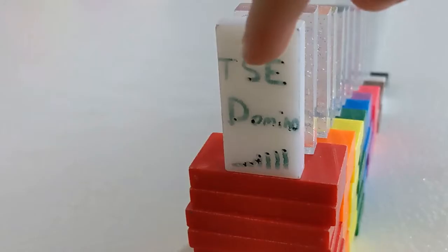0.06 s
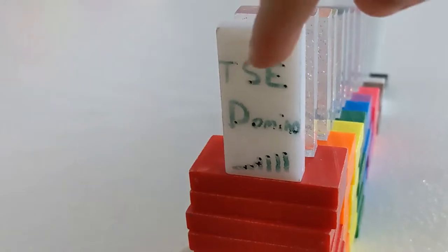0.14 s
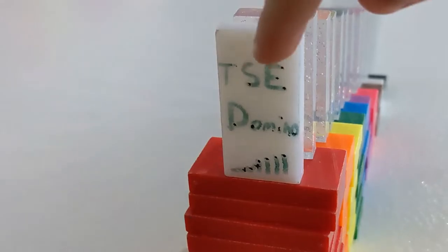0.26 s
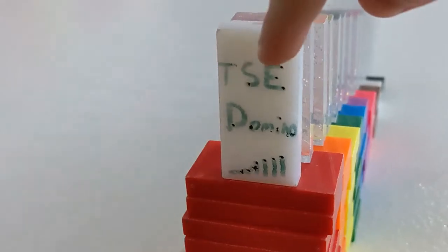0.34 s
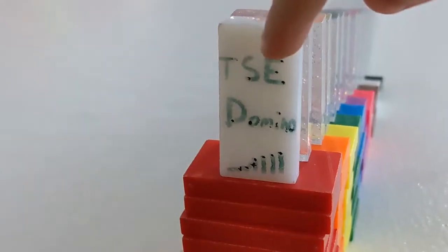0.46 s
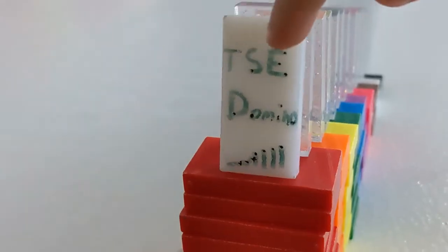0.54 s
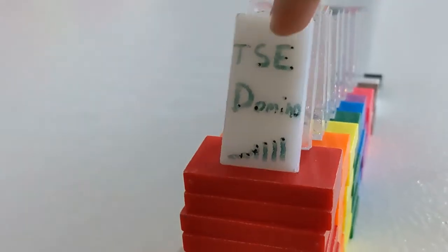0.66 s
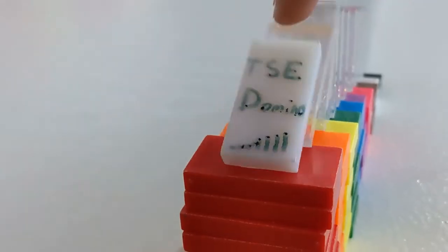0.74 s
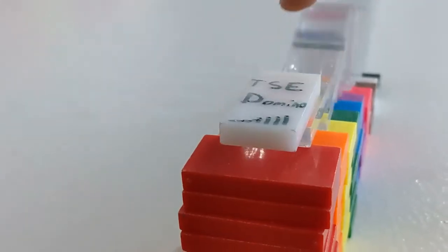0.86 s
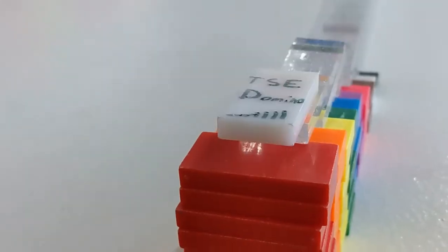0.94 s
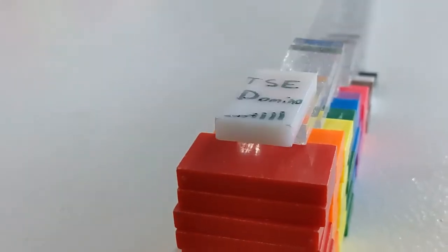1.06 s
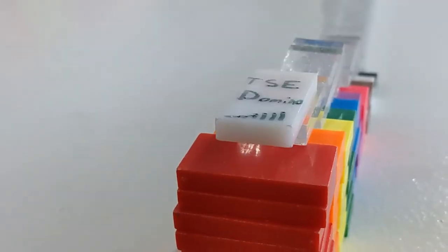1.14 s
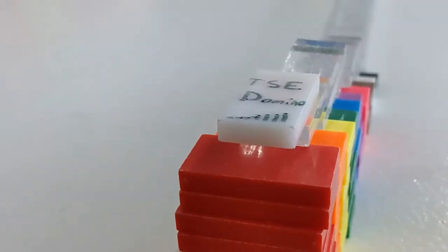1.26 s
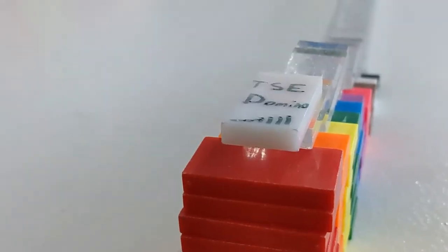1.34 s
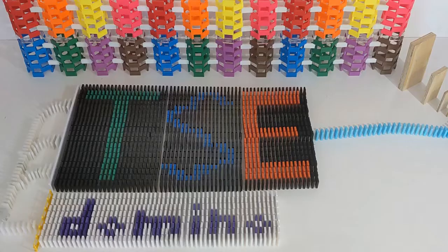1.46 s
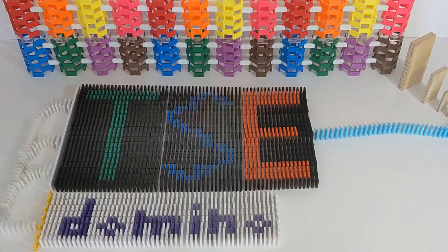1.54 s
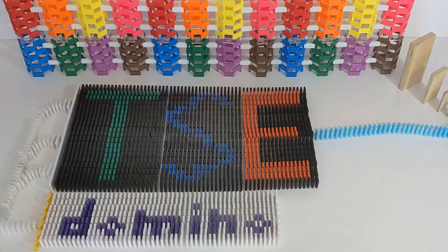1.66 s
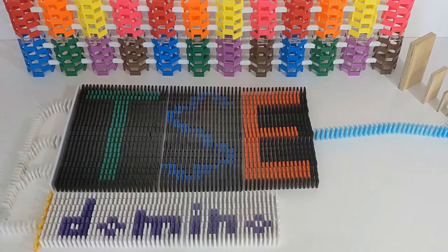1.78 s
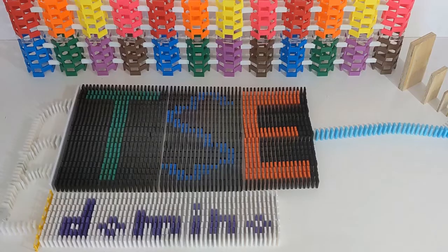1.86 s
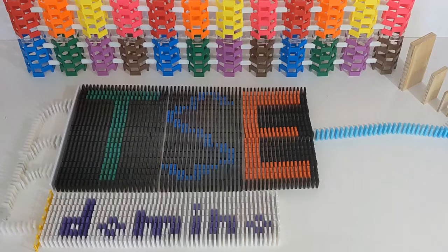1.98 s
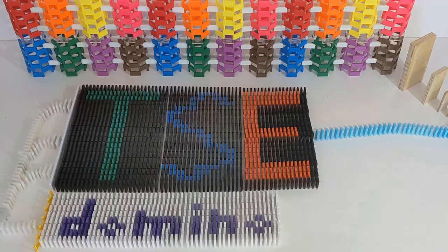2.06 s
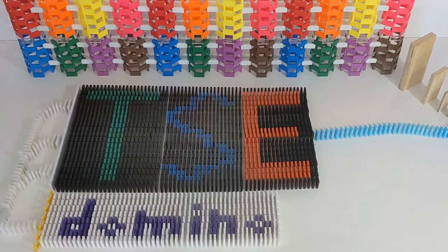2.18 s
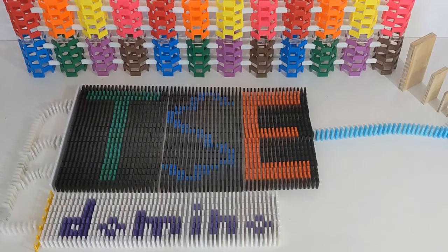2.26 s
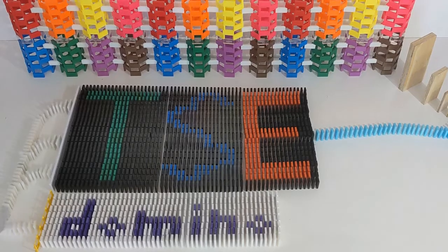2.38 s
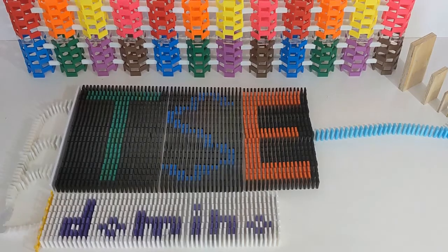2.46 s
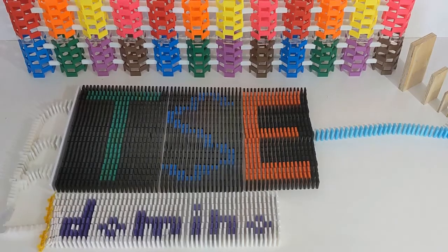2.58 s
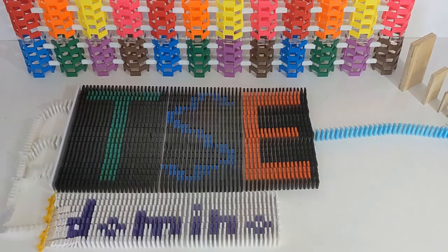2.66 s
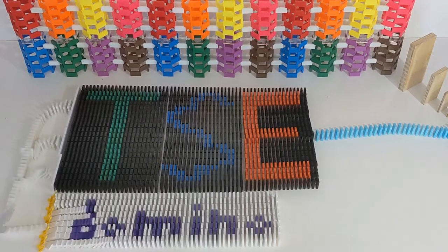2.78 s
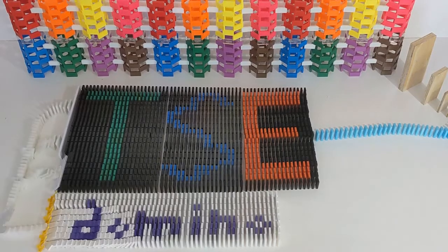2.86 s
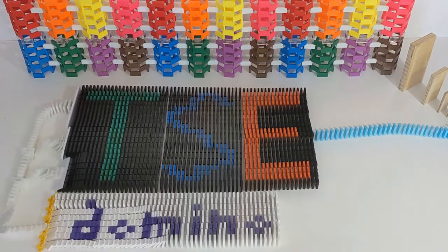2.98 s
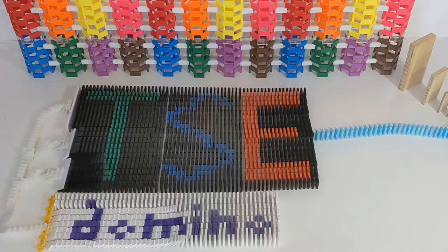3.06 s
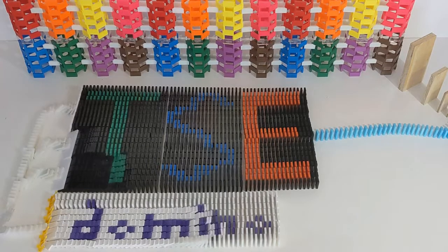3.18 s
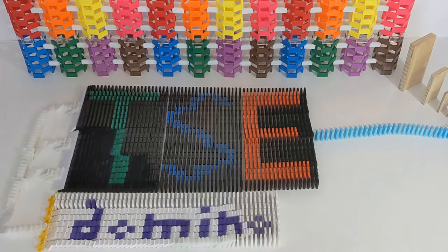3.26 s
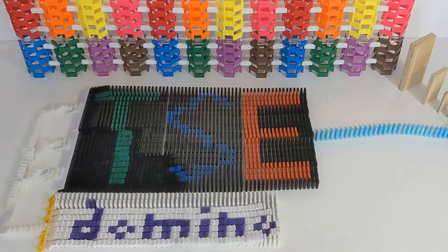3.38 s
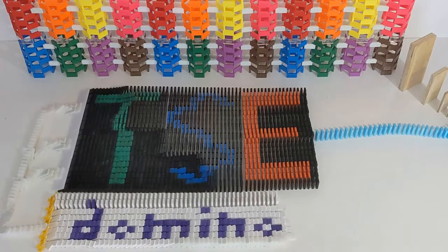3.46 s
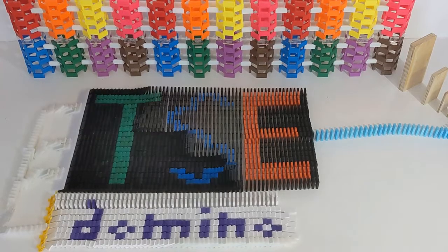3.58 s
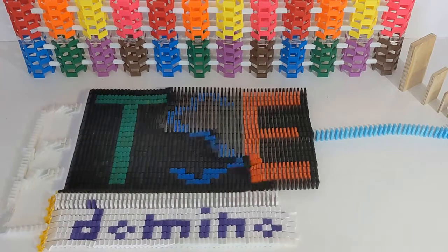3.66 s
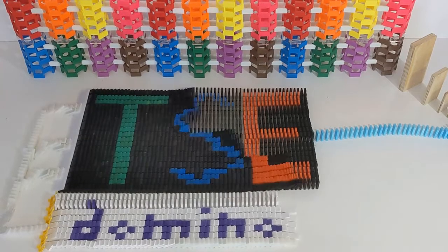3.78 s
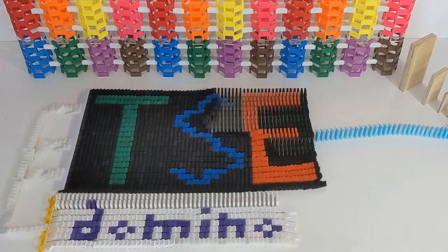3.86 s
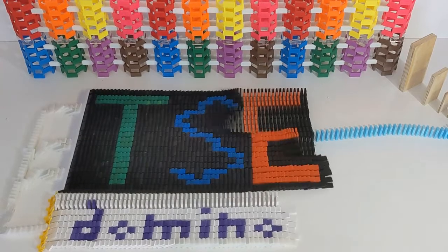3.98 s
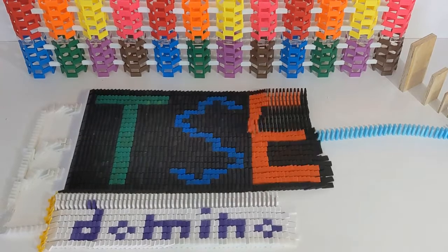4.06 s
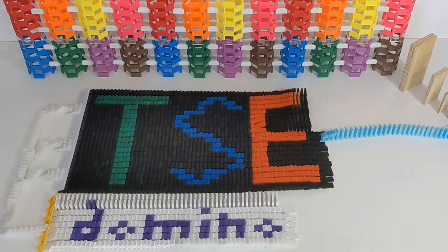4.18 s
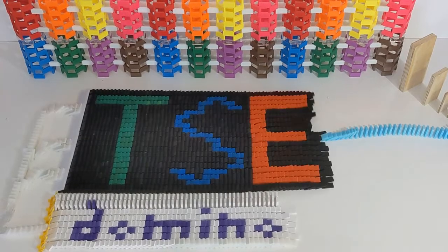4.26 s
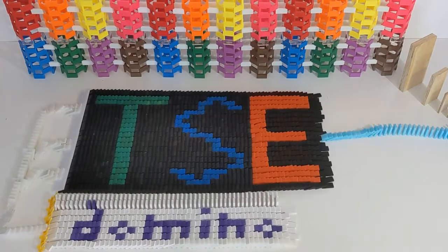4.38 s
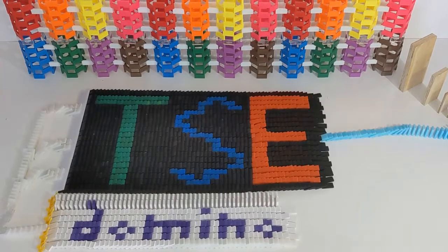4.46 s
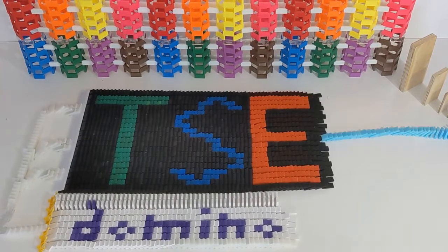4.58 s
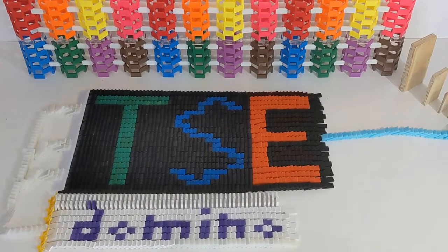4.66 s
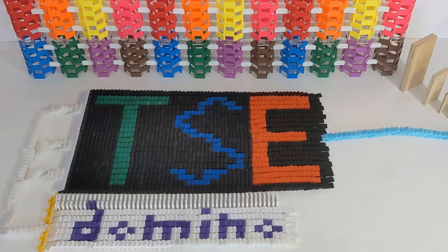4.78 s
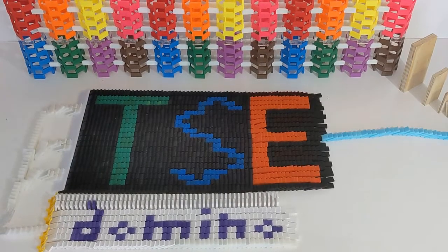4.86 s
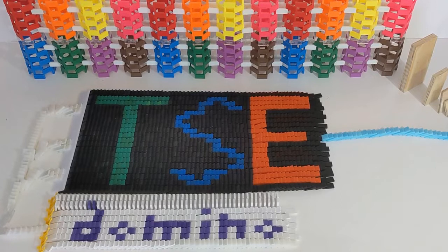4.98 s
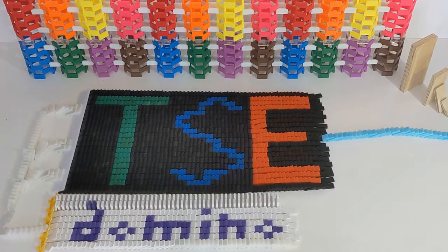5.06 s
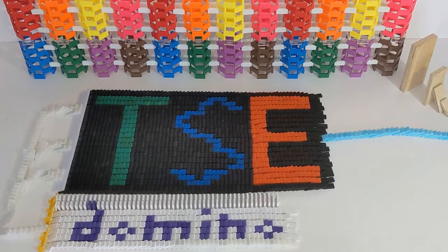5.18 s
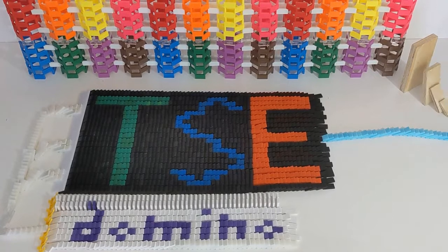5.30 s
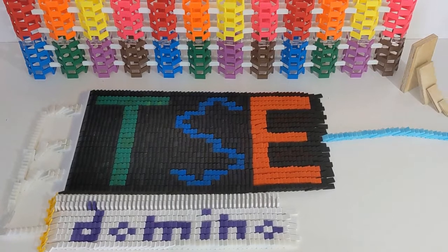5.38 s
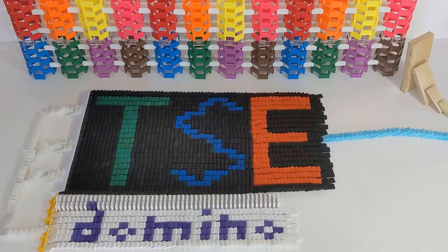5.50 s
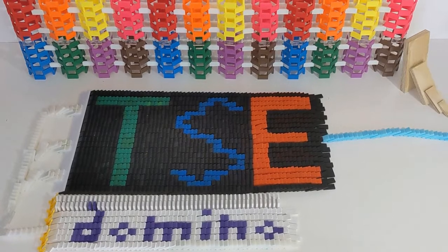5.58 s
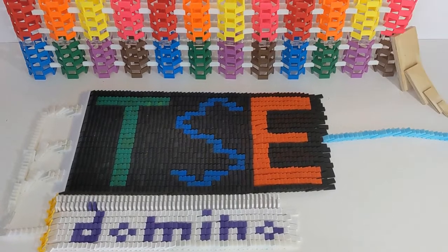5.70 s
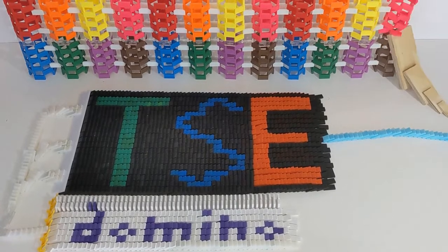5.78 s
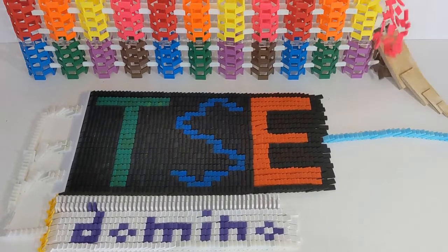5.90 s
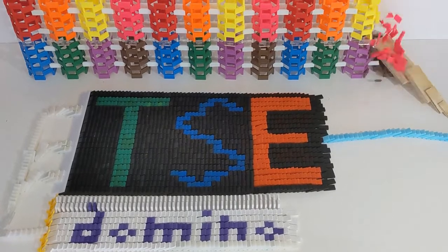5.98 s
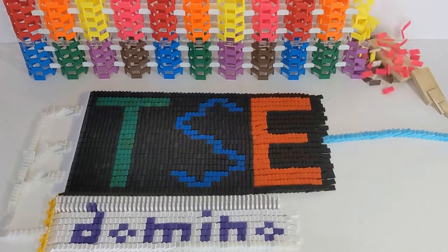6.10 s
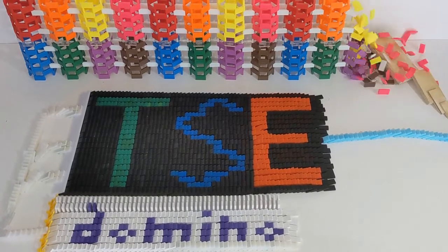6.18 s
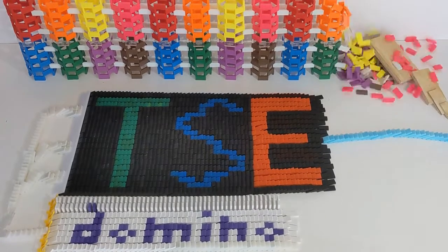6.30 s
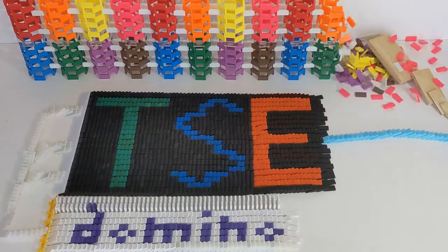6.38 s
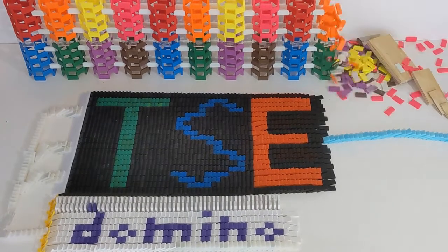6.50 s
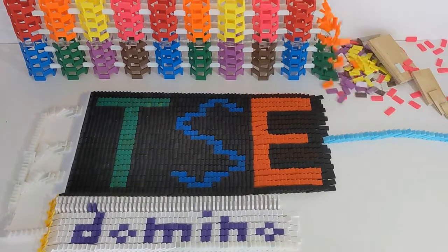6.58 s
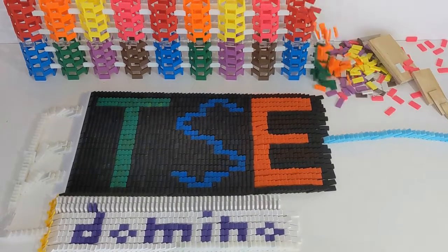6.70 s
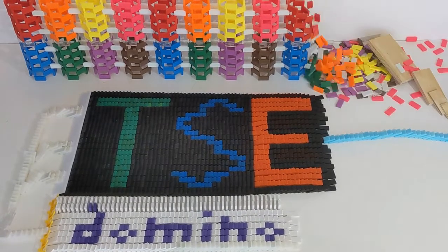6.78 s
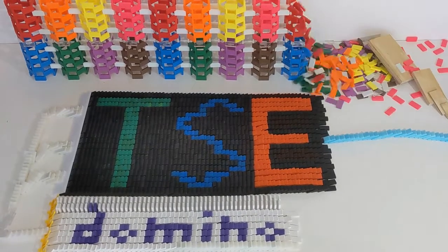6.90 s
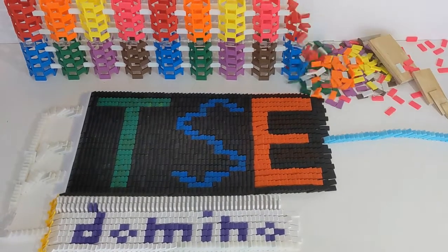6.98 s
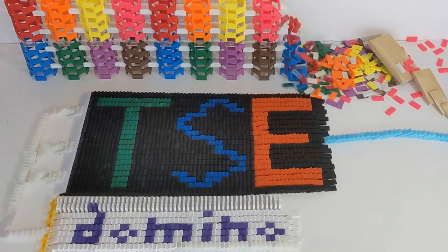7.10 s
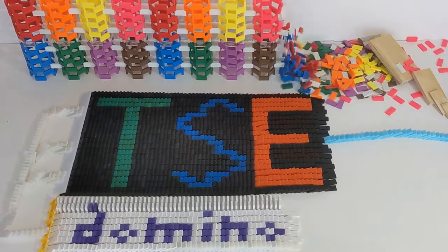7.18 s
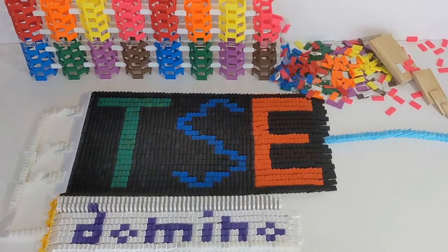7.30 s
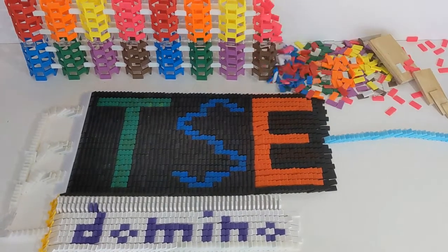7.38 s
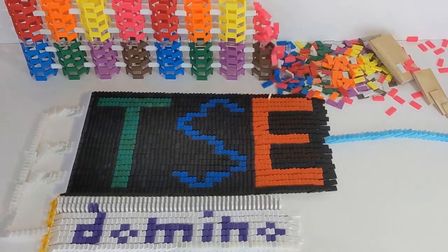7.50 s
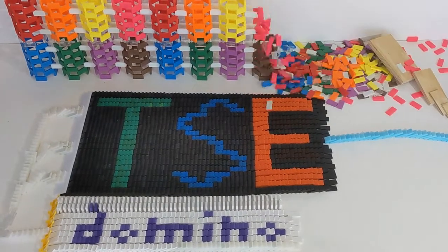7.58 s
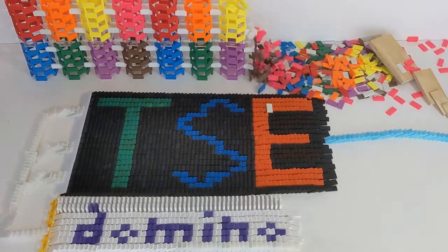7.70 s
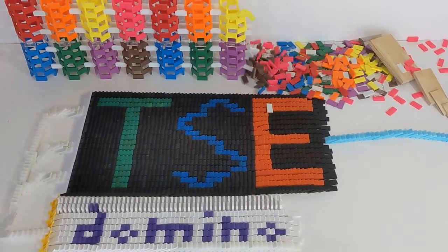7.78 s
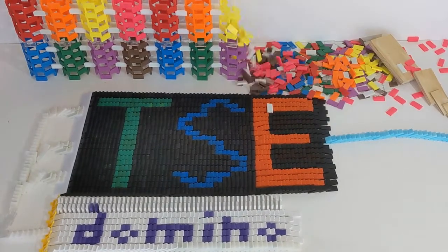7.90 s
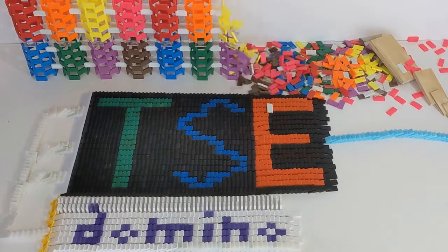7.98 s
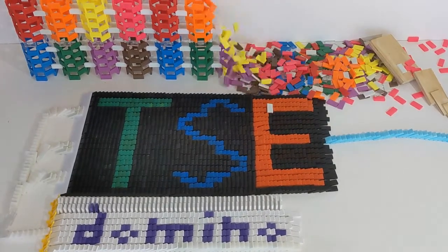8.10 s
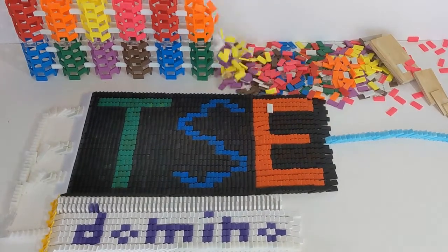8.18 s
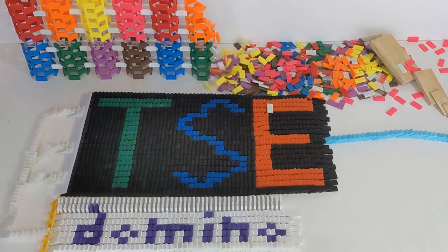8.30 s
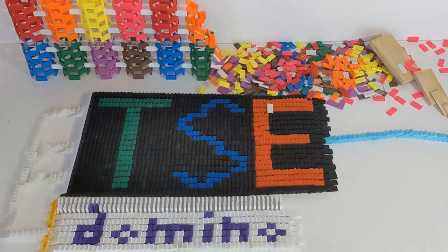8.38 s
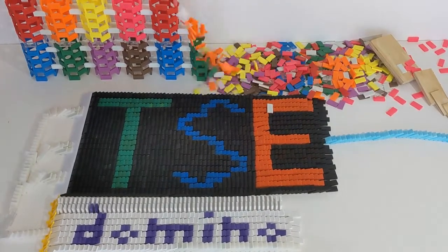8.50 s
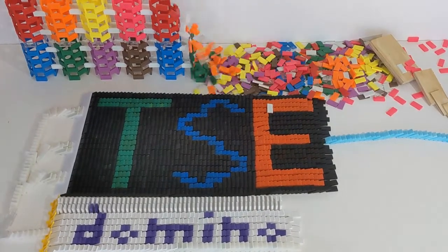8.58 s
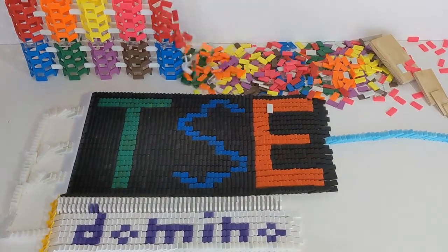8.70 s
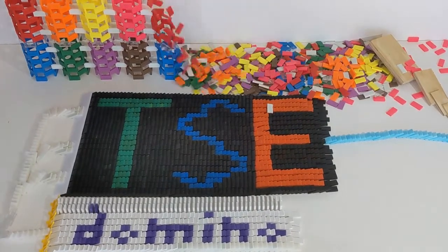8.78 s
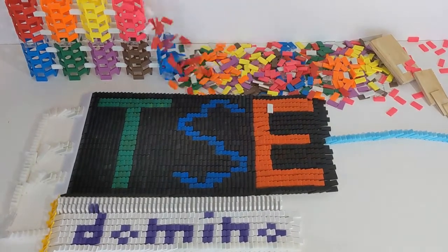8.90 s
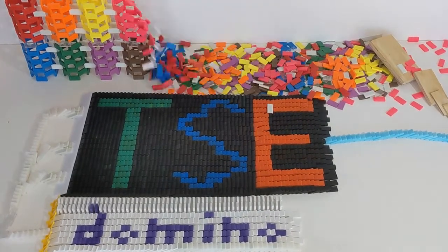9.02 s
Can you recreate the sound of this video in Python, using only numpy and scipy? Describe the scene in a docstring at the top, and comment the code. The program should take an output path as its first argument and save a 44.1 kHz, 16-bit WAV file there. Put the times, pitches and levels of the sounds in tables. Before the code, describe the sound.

Plastic dominoes topple in a bright, fast clicking rattle, wooden blocks knock over, then a stacked domino wall crashes down.

```python
"""A bright, clicking rattle of falling dominoes: a row of clear plastic tiles gathers speed, runs through
fields of opaque ones, knocks over wooden blocks of growing size and brings down a stacked wall.
The contacts click, ring the tiles, slap the air between their faces and thump the table.
A bare, live room answers, heard in stereo as from two spaced microphones."""
import sys
import numpy as np
from scipy import signal
from scipy.fft import rfft, irfft, next_fast_len
from scipy.io import wavfile
from scipy.ndimage import map_coordinates

SR = 44100
rng = np.random.default_rng(int(sys.argv[2]) if len(sys.argv) > 2 else 0)


def generate_wav(signal):
    """Clip the signal to [-1, 1] and save it as 16-bit WAV at the path in sys.argv[1]."""
    frames = np.transpose(np.atleast_2d(signal))
    scaled = np.clip(frames, -1, 1) * 32767
    pcm = np.round(scaled).astype(np.int16)
    wavfile.write(sys.argv[1], SR, pcm)


N = 399105

# ring of a clear tile: (frequency [Hz], width [Hz], level [dB])
CLEAR_RING = [(3120, 300, -7), (4380, 200, -5), (4750, 350, -6), (5680, 200, 0), (6210, 130, -7),
              (7000, 500, -8), (9000, 500, -12), (10060, 170, -11), (10960, 170, -11), (13000, 150, -3),
              (14140, 190, -8), (15500, 400, -12)]
# air slapped between clear faces, and between opaque ones: (frequency [Hz], width [Hz], level [dB])
CLEAR_SLAP_MODES = [(1340, 240, -9), (1720, 1120, 7.5), (2340, 410, 12.5), (2690, 400, -15.5)]
OPAQUE_SLAP_MODES = [(1128, 435, -11), (1378, 268, -4.5), (1880, 320, -2), (2300, 220, 1),
                     (2880, 400, -22.5)]
# thump of the tabletop: (frequency [Hz], width [Hz], level [dB])
TABLETOP_MODES = [(74, 6, -7), (147.8, 23, -3.5), (197.4, 41, -2), (237.4, 58, -0.5), (358, 55, -5),
                  (426, 88, -2.5), (622, 356, 2), (744, 384, 1.5)]
# tone of a bare contact's crack: (frequency [Hz], gain [dB])
CRACK_EQ = [(1000, -18.5), (3000, 10), (6000, 6.5), (9000, -0.5), (12000, 5), (16000, 3.5)]


def toppling(run, ring_modes, slap_modes, per_s, uneven_db, spread, crack_db, gain_db, ring_db,
             glint, thump_db, flicker_db):
    """Tiles about the moving front collide at random, a few much harder than the rest.
    glint: (offset from the slap [dB], extra share of the slap's swing, share of the ring curve)."""
    slap_db, bright_db = in_time(run)
    swing_db = slap_db - np.mean(run, axis=0)[1]
    glint_db = slap_db + glint[0] + glint[1] * swing_db + glint[2] * bright_db
    time = np.arange(N) / SR
    gate = np.clip(np.minimum(time - run[0][0], run[-1][0] - time) / 0.0056, 0, 1)
    at = np.flatnonzero((rng.random(N) < per_s / SR) & (gate > 0))
    aside = spread * rng.standard_normal(N)[at]
    force_db = uneven_db * np.minimum(rng.exponential(1, N), 4)
    sizes = (from_db(force_db) * rng.choice([-1, 1], N))[at]
    ring = rms_one(strike(ring_modes, at, sizes, 6.8, aside))
    ring = rms_one(ring + from_db(crack_db) * rms_one(crack(at, sizes, aside)))
    top = rms_one(filtered(ring, 4, 9000, "high"))
    body = rms_one(filtered(ring, 4, 9000, "low"))
    hollow, slap = (rms_one(strike(m, at, sizes, 4.0, aside)) for m in split_modes(slap_modes, 1600))
    thump = strike(TABLETOP_MODES, at, sizes, 5.23)
    thump = rms_one(filtered(thump, 2, 55, "high"))   # the thump carries little below about 55 Hz
    # the slap's hollow low end: (time [s], level against the slap [dB])
    hollow_curve = [(0.8, -16), (1.1, 3.5), (1.35, -13.5), (1.65, -2), (1.97, -22), (2.15, 2), (2.35, 4),
                    (2.6, 3), (2.85, -8), (3.45, -3.5), (4.1, -9.5), (4.6, -8), (4.9, 3.5), (6.0, -5.5),
                    (6.6, -8), (9.05, -7.5)]
    layers = [(slap_db + bright_db + ring_db, body), (glint_db, top),
              (slap_db + in_time(hollow_curve)[0], hollow), (thump_db + 0.56 * swing_db, thump)]
    # each layer wavers on its own as different tiles take over
    wavering = sum(from_db(db + flicker_db * drift(rate_hz=8.0)) * x for db, x in layers)
    return np.sqrt(np.mean(gate)) * gate * from_db(gain_db) * (from_db(slap_db) * slap + wavering)


def clear_row():
    """The opening row falls in a glassy rattle with little table thump."""
    # (time [s], slap level [dB], ring against slap [dB])
    run = [(0.81, -30, -7), (0.93, -31.5, -2), (1.08, -26.5, 8.5), (1.17, -33, -1.5), (1.34, -26.5, 2),
           (1.54, -28.5, -3.5), (1.65, -26.5, -4), (1.8, -30, -4.5), (1.97, -24.5, -7), (2.1, -27.5, -1.5),
           (2.28, -25.5, -9), (2.42, -52, 1)]
    return toppling(run, CLEAR_RING, CLEAR_SLAP_MODES, per_s=1300, uneven_db=4.0, spread=3.2,
                    crack_db=2.5, gain_db=-2.0, ring_db=-1.0, glint=(4.0, -.7, .05),
                    thump_db=-43.5, flicker_db=2.0)


def opaque_fields():
    """Many tiles fall side by side in a wider, denser, more even rattle."""
    # (time [s], slap level [dB], ring against slap [dB])
    run = [(2.3, -29, -2.5), (2.63, -30.5, -3), (2.74, -28, -0.5), (2.87, -19, -6.5), (2.95, -23, -2),
           (3.26, -17, -5.5), (3.48, -21.5, -1), (3.61, -23, -1), (3.9, -17, -3.5), (4.0, -24, 4),
           (4.06, -23, -4.5), (4.16, -19, 1), (4.26, -23.5, -6.5), (4.33, -21.5, 1.5), (4.36, -22, 7),
           (4.48, -30, -3), (4.6, -25, -5), (4.91, -36.5, -2)]
    # ring of an opaque tile: (frequency [Hz], width [Hz], level [dB])
    ring_modes = [(3210, 540, -2.5), (4404, 240, 2.5), (5500, 710, -28), (7180, 320, 3), (8230, 400, -3),
                  (9100, 560, -2.5), (10400, 250, -21), (11900, 400, -6), (11900, 800, -11.5),
                  (13300, 660, -2.5), (14400, 500, -19), (15600, 500, -6)]
    return toppling(run, ring_modes, OPAQUE_SLAP_MODES, per_s=1600, uneven_db=1.5, spread=6.0,
                    crack_db=2.0, gain_db=-1, ring_db=-1.5, glint=(-2.5, .4, .9),
                    thump_db=-40.5, flicker_db=1.5)


def stacked_wall(ring_modes):
    """Stacked tiles crash down unevenly and thump the table harder."""
    # (time [s], slap level [dB], ring against slap [dB])
    run = [(5.8, -34.5, -10), (5.89, -21, -1.5), (5.93, -37, 4), (5.94, -21.5, 2.5), (6.0, -25, 3),
           (6.08, -19, -5.5), (6.32, -19.5, -2), (6.98, -21.5, 0.5), (7.03, -21.5, -6), (7.05, -19, 0),
           (7.08, -26.5, 9), (7.13, -22, -1), (7.15, -23, 0), (7.33, -19, -4), (7.56, -19.5, -5.5),
           (7.58, -20.5, 0.5), (7.84, -17, -4.5), (7.86, -21, 0), (8.0, -16.5, -6), (8.02, -20.5, -0.5),
           (8.76, -17, -4.5), (8.93, -27.5, 4), (8.95, -14, -10.5), (9.05, -25, 5)]
    return toppling(run, ring_modes, OPAQUE_SLAP_MODES, per_s=1500, uneven_db=3.5, spread=6.0,
                    crack_db=0.0, gain_db=-1.5, ring_db=1.5, glint=(-3.0, .05, .9),
                    thump_db=-37.5, flicker_db=1.5)


def clear_clicks(rows, length_s, ring_db, glint_db, slap_db, crack_db, scatter_db):
    """Single clear tiles click above the rattle, each with its own share of glint and slap."""
    # the tone shifts as the row runs away: (time [s], glint [dB], slap [dB])
    receding = [(0.73, -21.5, -14), (0.93, -18, -29.5), (1.12, -11, -12), (1.45, -20, -23)]
    at, sizes, row = chatter(rows, length_s, fade_db=2.5, count=6)
    shares = from_db(scatter_db * rng.standard_normal((len(rows), 2)))[row].T
    glint, slap = shares * from_db(in_time(receding))[:, at.astype(int)]
    body_modes, glint_modes = split_modes(CLEAR_RING, 8800)
    return (from_db(ring_db) * strike(body_modes, at, sizes, 2.9)
            + from_db(glint_db) * strike(glint_modes, at, sizes * glint, 0.67)
            + from_db(crack_db) * crack(at, sizes * np.sqrt(glint))
            + from_db(slap_db) * strike(CLEAR_SLAP_MODES, at, sizes * slap, 2))


def first_tiles():
    """The first tiles gather speed; a few later ones land hard."""
    # (time [s], level [dB])
    landings = [(0.515, -43.5), (0.7294, -16), (0.7336, -15), (0.8055, -0.5), (0.8527, 0), (0.8564, 0.5),
                (0.8834, -1), (0.895, 0.5), (0.8984, -17), (0.9178, 0), (0.9254, -7), (0.948, -5),
                (0.9725, -4), (0.9985, -8), (1.0246, -1.5), (1.0465, -12.5), (1.0632, -5), (1.079, -13),
                (1.0894, -34.5), (1.102, -2), (1.2908, -2.5), (1.3344, -10), (1.4376, 0), (1.6, -11)]
    return clear_clicks(landings, length_s=.0035, ring_db=21.5, glint_db=34.5, slap_db=16.5,
                        crack_db=-14, scatter_db=6.0)


def ticking(start_s, every_s, count):
    """At full speed the clear row ticks almost evenly."""
    jitter = rng.standard_normal((count, 2))
    times = start_s + every_s * np.arange(count) + .0006 * jitter[:, 0]
    levels_db = -11.5 + 2.2 * jitter[:, 1]
    return clear_clicks(list(zip(times, levels_db)), length_s=.002, ring_db=20.5, glint_db=33,
                        slap_db=23, crack_db=-3, scatter_db=3.0)


def wooden_blocks():
    """Each block knocks and rings on a note set by its size; the heavier ones shake the table."""
    # (time [s], level [dB], crack [dB], thump [dB], note [Hz], note level [dB])
    knocks = [(4.827, -23, -15, -29, 1410, -4), (4.852, -8, -22, -34, 1110, 0),
              (4.923, -2, -29, -37, 1094, -24), (5.022, -10, 6.5, -28, 1400, -5),
              (5.12, -9.5, 0, -16.5, 2280, -21), (5.139, -20, -15, -16, 2350, 15),
              (5.445, -10.5, -19, -4, 1950, -4), (5.696, -23, -11, -24, 1270, 17),
              (5.717, -15, -33, -15, 1252, 12.5), (5.732, -17, -24, -12, 1277, 7.5),
              (5.779, -19.5, -25, -12, 1300, -4), (5.827, -20, -1, -8, 1230, 6),
              (5.895, -10.5, -12, -16, 1270, 11), (5.943, -4.5, -1.5, -25.5, 2300, 3),
              (6.018, -3.5, -12, -23, 1290, 4), (6.09, -10.5, -15, -14.5, 1280, 10),
              (6.139, -12, 1, -38.5, 1240, -6)]
    # woody body of a knock: (frequency [Hz], width [Hz], level [dB])
    wood_modes = [(527, 530, -14.5), (844, 110, -5.5), (1100, 230, 5), (1400, 600, 2.5), (1950, 160, 7),
                  (2300, 870, 1), (3600, 1340, -2.5), (4680, 1720, -6)]
    at, sizes, row = chatter(knocks, length_s=.011, fade_db=8.0, count=8)
    crack_db, thump_db = np.array(knocks)[row, 2:4].T
    # later blocks are bigger and reach the table's deepest modes
    deep = from_db(0.63 * thump_db + 15.5 * (at / SR - knocks[-1][0]))
    deep_modes, thump_modes = split_modes(TABLETOP_MODES, 150)
    push = np.abs(sizes)   # the table is always pushed down
    notes = sum(strike([(hz, 30, db)], at[row == k][:1], push[row == k][:1], 0.75)   # first touch only
                for k, (*_, hz, db) in enumerate(knocks))
    dull_crack = filtered(crack(at, sizes * from_db(crack_db)), 2, 7200, "low")   # softer than plastic
    return (from_db(21.5) * strike(wood_modes, at, sizes, 0.56)
            + from_db(31.5) * notes + from_db(9.0) * dull_crack
            + from_db(39) * strike(thump_modes, at, push * from_db(thump_db), 0.31)
            + from_db(47.5) * strike(deep_modes, at, push * deep, 0.55))


def loose_pings(ring_modes, width_hz, ping_db, ring_db, crack_db):
    """A loose tile struck on an edge or corner sounds one mode far above the rest."""
    # (time [s], level [dB], pitch [Hz])
    pings = [(2.4214, -12, 11500), (2.5466, -8, 9100), (3.1158, 4, 11000), (3.169, 7, 11700),
             (3.5346, 6, 6700), (3.981, 2, 7040), (4.338, 7, 7190), (4.853, -2, 4500), (5.8685, -5, 4020),
             (5.9676, -18, 4060), (6.2525, -37, 4280), (6.297, -24, 4370), (6.6287, 0, 6760),
             (6.6594, 2, 14100), (6.937, -11, 6600), (7.1521, -8, 6700), (7.3567, -17, 4350),
             (7.58, 8, 12950), (7.6194, -24, 4300), (7.7714, -25, 4400), (8.182, 3, 4330), (8.775, 6, 4440),
             (8.809, 3, 13200)]
    at, sizes, row = chatter(pings, length_s=0.0035, fade_db=4.0, count=4)
    notes = sum(strike([(hz, width_hz, 0)], at[row == k], sizes[row == k], 0.46)
                for k, (_, _, hz) in enumerate(pings))
    return (from_db(ping_db) * notes + from_db(ring_db) * strike(ring_modes, at, sizes, 5.4)
            + from_db(crack_db) * crack(at, sizes))


def link_row(start_s, end_s, per_s):
    """A lone row leads from the fields to the blocks, its quick contacts ringing thinly."""
    # (frequency [Hz], width [Hz], level [dB])
    thin_modes = [(4570, 350, -0.5), (9930, 150, -4.5), (11400, 140, -6)]
    time = np.arange(N) / SR
    at = np.flatnonzero((rng.random(N) < per_s / SR) & (time > start_s) & (time < end_s))
    return from_db(14.5) * strike(thin_modes, at, rng.standard_normal(N)[at] / 10, 5.0)


def chatter(rows, length_s, fade_db, count):
    """A face never lands flat: a first touch, then weaker ones. Gives times [samples], sizes, rows."""
    draw = rng.random((len(rows), 2 * count))
    rebound = np.arange(count) > 0
    late = draw[:, :count] * rebound
    at = (np.array(rows)[:, :1] + length_s * late) * SR
    sizes = from_db(np.array(rows)[:, 1:2] - fade_db * (late + rebound)) * np.sign(draw[:, count:] - .5)
    return at.ravel(), sizes.ravel(), np.repeat(np.arange(len(rows)), count)


def strike(modes, at, sizes, scatter_db, spread=0):
    """Each contact rings every mode with a strength of its own."""
    strength = from_db(scatter_db * rng.standard_normal((len(at), len(modes))))
    out = 0
    for k, (hz, width, level_db) in enumerate(modes):
        r = np.exp(-np.pi * width / SR)
        poles = [1, -2 * r * np.cos(2 * np.pi * hz / SR), r * r]
        gain = from_db(level_db) * (1 - r * r) / 2 * (-1) ** k
        out = out + signal.lfilter([gain, 0, -gain], poles, place(at, sizes * strength[:, k], spread))
    return out


def crack(at, sizes, spread=0):
    """The bare snap of contact: each click becomes a sharp, minimum-phase pulse."""
    hz = np.maximum(np.fft.rfftfreq(4096, 1 / SR), 1)
    cepstrum = irfft(np.log(from_db(at_hz(CRACK_EQ, hz))))
    cepstrum[1:2048] *= 2   # folded onto positive times, so nothing sounds before the hit
    pulse = irfft(np.exp(rfft(cepstrum[:2048], 4096)))
    size = next_fast_len(N + 4096)
    return irfft(rfft(place(at, sizes, spread), size) * rfft(pulse, size), size)[..., :N]


def place(at, sizes, spread=0):
    """Clicks panned and delayed to follow the action; spread [samples] shifts each aside."""
    # (time [s], lag of the left channel [samples], left over right [dB])
    path = [(0, 9.5, 18), (1.2, 7.5, -6), (1.7, 4, 5), (2.2, -10.5, 2), (3.2, -5.5, 3.5), (4.2, 0, 6.5),
            (4.8, 7.5, 3), (5.8, 2, 2.5), (7, 0, 3.5), (9.05, -3.5, 1)]
    times, lags, pans = np.transpose(path)
    lag, pan_db = (np.interp(at / SR, times, c) for c in (lags, pans))
    out = np.full((2, N), 1e-18)
    for channel, side in enumerate((.5, -.5)):
        arrival = np.clip(np.round(at + side * (lag + spread)).astype(int), 0, N - 1)
        np.add.at(out[channel], arrival, sizes * from_db(side * (pan_db - 0.066 * spread)))
    return out


def room(send, first_s, step_s, count):
    """Dense reflections die away band by band; their pattern shifts each step as the action moves."""
    # (frequency [Hz], time to fall 60 dB [s])
    decay = [(100, 0.83), (500, 0.63), (2000, 0.7), (5000, 0.52), (10000, 0.19), (16000, 0.32)]
    length = int(.55 * SR)
    time = np.arange(length) / SR
    turn = np.arange(N) / SR / step_s
    bands = list(stereo_bands(count * length))
    out = 0
    for k in range(count):
        tail = sum(band[:, k * length:(k + 1) * length] * from_db(-60 * time / at_hz(decay, hz))
                   for hz, band in bands)
        tail = tail * np.clip(time / first_s - 1, 0, 1) / np.sqrt(SR)
        steps_away = np.abs((turn - k + count / 2) % count - count / 2)
        crossfade = np.sqrt(np.clip(1 - steps_away, 0, 1))
        out = out + signal.oaconvolve(crossfade * send.mean(axis=0, keepdims=True), tail, axes=1)[:, :N]
    return out


def room_tone():
    """Steady air and microphone hiss over a low rumble that wavers at the start."""
    # colour of the air: (frequency [Hz], relative level [dB])
    air_eq = [(18, -49), (30, -25.5), (85, -15), (249, -10.5), (359, -35), (410, -15), (518, -14.5),
              (622, -25.5), (1050, -21.5), (1680, -29), (15500, -40)]
    # (time [s], level [dB])
    rumble_curve = [(0.04, -74), (0.124, -58), (0.152, -73), (0.508, -78), (0.596, -56), (0.8, -66.5)]
    bands = list(stereo_bands(N))
    air = rms_one(sum(from_db(at_hz(air_eq, hz)) * band for hz, band in bands))
    rumble = rms_one(sum(band for hz, band in bands[2:4]))
    return from_db(-66) * air + from_db(in_time(rumble_curve)[0]) * rumble


def stereo_bands(length):
    """Half-octave noise bands, as alike left and right as the microphone spacing allows."""
    # (frequency [Hz], left-right correlation [0-1])
    likeness = [(60, 0.98), (150, 1), (300, 0.92), (600, 0.62), (1200, 0.02), (16000, 0.24)]
    edges = 30 * 2 ** np.arange(0, 9.6, .5)
    white = rng.standard_normal((2, 2, length))
    for k, (low, high) in enumerate(zip(edges, edges[1:])):
        mid, side = filtered(white[k % 2], 2, [low, high], "band")
        hz = np.sqrt(low * high)
        alike = at_hz(likeness, hz)
        yield hz, np.sqrt(1 + alike) * mid + np.sqrt(1 - alike) * side * [[1], [-1]]


def drift(rate_hz):
    """A slow wobble: random points joined smoothly."""
    return map_coordinates(rng.standard_normal(256), [np.arange(N) / SR * rate_hz * 2], order=3)


def split_modes(modes, edge_hz):
    """Modes under and over an edge."""
    return [m for m in modes if m[0] < edge_hz], [m for m in modes if m[0] >= edge_hz]


def filtered(x, order, hz, kind):
    """A low-, high- or band-pass with a flat passband."""
    return signal.sosfilt(signal.butter(order, hz, kind, fs=SR, output="sos"), x)


def from_db(db):
    """Gain of a level."""
    return 10 ** (np.asarray(db) / 20)


def rms_one(x):
    """Scaled to unit rms."""
    return x / np.sqrt(np.mean(x ** 2) + 1e-20)


def in_time(rows):
    """Columns of a curve at every sample."""
    times, *columns = np.transpose(rows)
    return [np.interp(np.arange(N) / SR, times, c) for c in columns]


def at_hz(points, hz):
    """A curve read on a log frequency axis."""
    return np.interp(np.log(hz), np.log(np.array(points)[:, 0]), np.array(points)[:, 1])


def scene():
    """Clear row, fields, blocks and wall, each with its send to the room."""
    # ring of the wall's tiles and the loose ones: (frequency [Hz], width [Hz], level [dB])
    tile_ring = [(3300, 510, -13), (4400, 103, 2), (5730, 640, -17), (6560, 130, -2), (7040, 570, -9.5),
                 (8560, 360, -7), (9760, 370, -11), (10790, 310, -5.5), (11500, 210, -12), (13260, 300, -5),
                 (14200, 200, -16), (15400, 600, -8)]
    clicks = first_tiles() + ticking(start_s=1.1144, every_s=.01469, count=22)
    pings = loose_pings(tile_ring, width_hz=200, ping_db=20, ring_db=8.5, crack_db=-23)
    link = link_row(start_s=4.44, end_s=4.97, per_s=350)
    rattle = link + clear_row() + opaque_fields() + stacked_wall(tile_ring)
    wood = wooden_blocks()
    # short clicks and pings feed the room less than the rattle
    send = from_db(3.5) * clicks + from_db(11) * pings + from_db(17.0) * rattle + from_db(18.5) * wood
    reverb = room(send, first_s=0.0017, step_s=.05, count=11)
    return clicks + pings + rattle + wood + reverb + room_tone()


def record(dry):
    """A quick fade-in a moment after the start, rounded peaks and a steep cut of the very top."""
    fade_in = np.clip((np.arange(N) / SR - 0.043) / .01, 0, 1)
    high_cut = signal.ellip(12, .5, 75, 15740, fs=SR, output="sos")
    return signal.sosfilt(high_cut, .95 * np.tanh(dry * fade_in / .95))


dry = scene()
out = record(dry)
generate_wav(out)
```